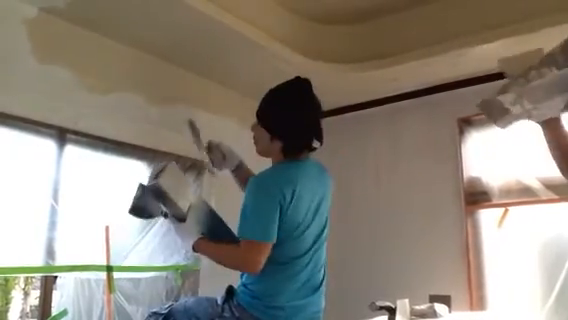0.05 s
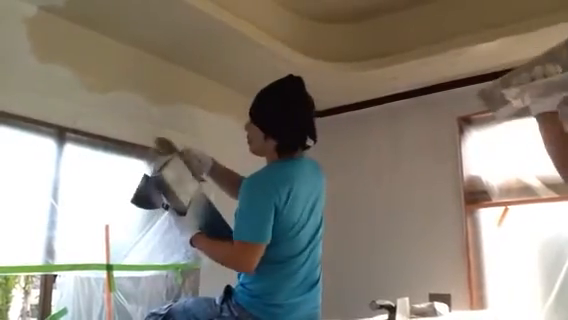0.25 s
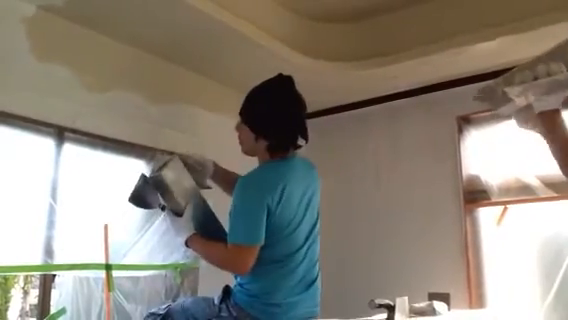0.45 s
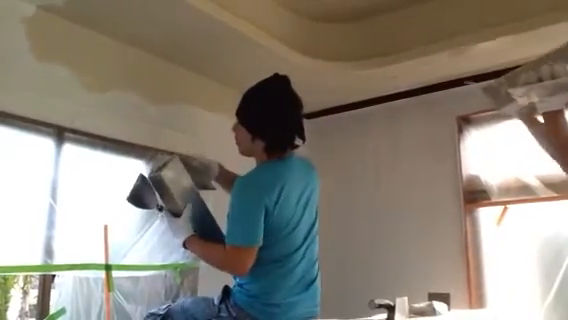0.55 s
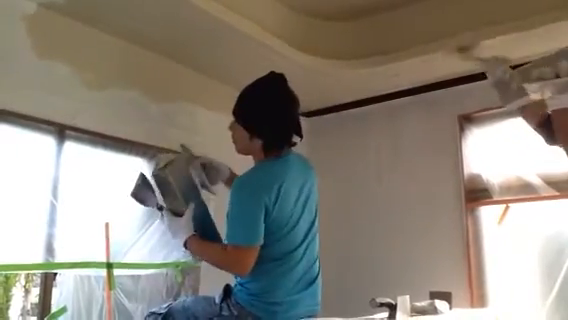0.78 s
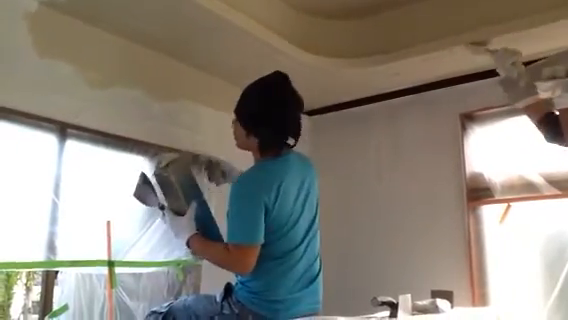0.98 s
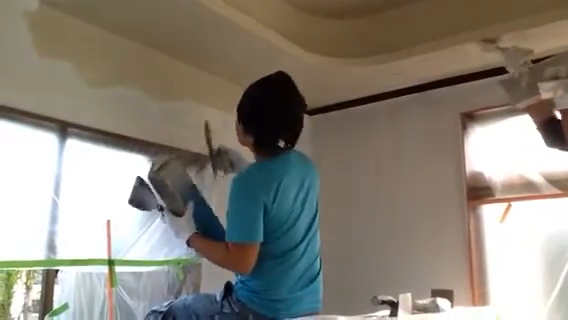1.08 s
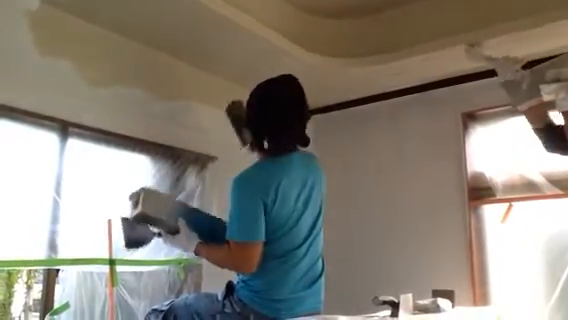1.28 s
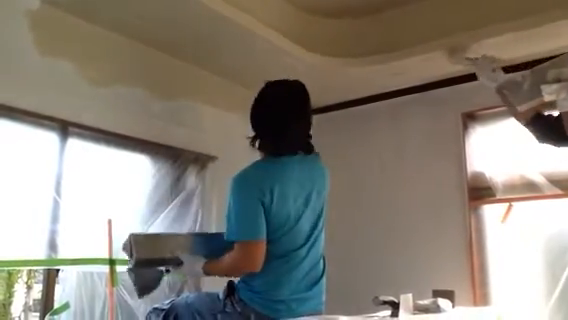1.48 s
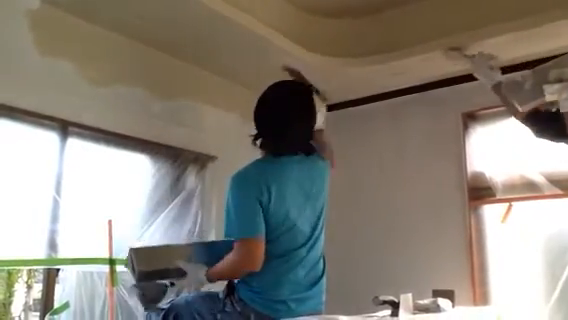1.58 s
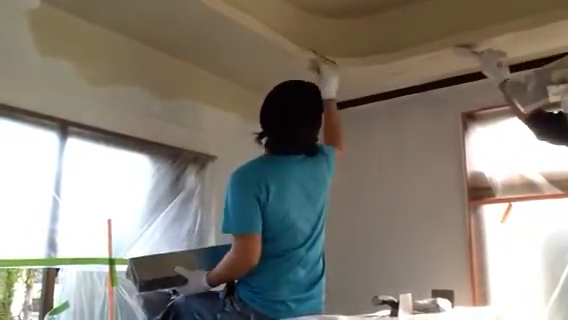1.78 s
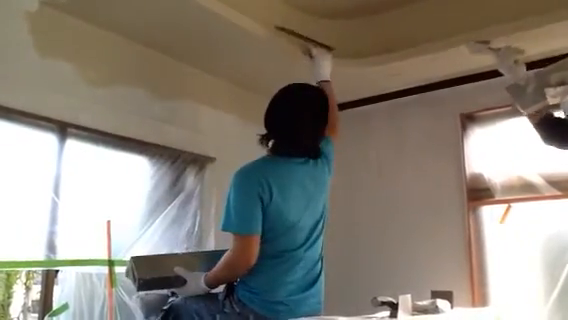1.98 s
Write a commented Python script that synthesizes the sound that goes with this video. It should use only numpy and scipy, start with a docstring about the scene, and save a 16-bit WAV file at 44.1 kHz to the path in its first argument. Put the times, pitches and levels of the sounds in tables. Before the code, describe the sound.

Trowel knocks and a gritty scrape on a plaster board, then a wet slap indoors.

```python
"""In a bare room, a plasterer knocks a steel trowel twice on a hawk (a hand-held mortar board),
scrapes up a load and slaps it on the ceiling. Each impact is a noise burst that reverberates; the
knocks excite the hawk's modes and a low room resonance, the slap and taps the blade's modes. Friction
on sand makes the scrape, and stick-slip motion makes the blade judder. Light taps, faint smoothing
strokes, thin squeaks and one swell of low hum sound over low steady room noise."""
import sys
import numpy as np
from scipy import signal
from scipy.fft import rfft, irfft
from scipy.io import wavfile
from scipy.ndimage import uniform_filter1d

SR = 44100
rng = np.random.default_rng(int(sys.argv[2]) if len(sys.argv) > 2 else 0)


def unload_audio(sound):
    """Save the sound as a 16-bit wav file, at the path given as the first command line argument."""
    columns = np.transpose(np.atleast_2d(sound))
    # keep every value between -1 and 1, then stretch to whole-number steps
    steps = np.round(np.clip(columns, -1, 1) * 32767)
    wavfile.write(sys.argv[1], SR, steps.astype(np.int16))


N = 90404

# Spectra of the sources. Each row: frequency in Hz, relative spectral density in dB.
ROOM_NOISE_SPECTRUM = [(20, -40), (50, -48), (100, -18.5), (150, -3.5), (205, -1), (255, -7), (310, 1.5),
                       (400, -6), (600, -7), (1000, -14.5), (1700, -19.5), (3000, -24.5), (9000, -24),
                       (15500, -28)]
STROKE_SPECTRUM = [(30, -23), (1000, 1), (2700, -10.5), (4300, 2), (8000, 4), (15500, -1)]
THUD_SPECTRUM = [(30, -35), (80, -38), (170, -16.5), (350, -12.5), (520, -4), (800, -0.5), (1020, -6),
                 (1300, 0), (2400, -9.5), (4000, -9), (15000, -57)]
CRACK_SPECTRUM = [(30, -52), (300, -19), (1200, -6), (2300, 7), (3200, -3.5), (5000, -1), (9000, -1),
                  (12000, -4), (15500, -16)]
SCRAPE_SPECTRUM = [(30, -45), (150, -25), (330, -1), (450, -14), (750, -7), (1100, -1.5), (2500, -3),
                   (3900, 2.5), (5200, 0.5), (8000, 3.5), (11500, -2.5), (15500, -5.5)]
SLIP_SPECTRUM = [(30, -62), (100, -49), (190, -5.5), (380, -26.5), (560, -6.5), (680, -3), (770, 5),
                 (1020, -5), (1260, -4), (1420, -6.5), (1600, -1.5), (2300, -18), (4000, -17.5),
                 (15000, -55)]
TAP_SPECTRUM = [(30, -33), (600, -18), (900, 0.5), (1200, -4.5), (1500, -1.5), (1950, 2), (3100, -8.5),
                (4500, -9.5), (8000, -19.5), (15500, -31)]
SPLAT_SPECTRUM = [(30, -34), (90, -25), (170, -1.5), (700, -9), (1000, -9), (1550, 1.5), (2800, 1.5),
                  (4000, 3.5), (6000, 0.5), (10000, 2.5), (15500, -1)]
# Reverberation of the room. Each row: frequency in Hz, time to fall 60 dB (T60) in seconds.
ROOM_T60 = [(150, 0.67), (700, 0.53), (2000, 0.39), (5500, 0.33), (15000, 0.25)]
# Smoothing strokes. Each row: start and length in seconds, level in dB, tilt in dB per octave.
SMOOTHING_STROKES = [(0.036, .24, -62.5, -4.5), (.93, 0.31, -64, -4.5), (1.212, 0.036, -51.5, 5),
                     (1.314, 0.053, -54, 4.5), (1.375, 0.11, -64.5, 4), (1.92, 0.11, -65, -5)]
# Squeaks. Each row: start and length in seconds, first and last frequency in Hz, level in dB.
SQUEAK_GLIDES = [(.11, 0.043, 11900, 13100, -66), (0.735, 0.093, 11900, 11850, -64),
                 (1.88, .06, 12100, 12400, -66)]
# Contacts of trowel and hawk; the first four merge into one knock. Each row: start in seconds,
# thud and crack levels in dB, crack tilt in dB per octave, ring level in dB, contact decay in
# seconds, place struck from 0 (face) to 1 (edge).
KNOCK_CONTACTS = [(0.2459, -36.5, -34.5, -3, -35, 0.0026, 0), (.2478, -36, -27, 2.5, -38.5, 0.0026, 0.053),
                  (0.2534, -33, -27, -2.9, -32, 0.0039, 0.14), (.2625, -25, -46, -10, -38, 0.0032, 0.16),
                  (.4046, -31, -31.5, -0.5, -31.5, 0.0058, 0.87)]
# Tones that ring after a knock: a low room resonance (337 Hz) and the hawk's modes.
# Each row: frequency in Hz, gains in dB for a blow on the face and on the edge, T60 in seconds.
KNOCK_TONES = [(337, -26, -20.5, 0.6), (466, -2, -11, .5), (648, 1, -16, 0.33), (754, -3, -1, 0.47),
               (771, -17, 2.5, 0.56), (853, 4, -9, 0.23), (930, -6, -10, 0.33), (1242, -5.5, 3, 0.27),
               (1584, -9, 1, 0.22), (1777, -17, -8, 0.2), (1900, -25, -1, 0.083), (2070, -13, -16, 0.16),
               (2259, -2, -5.5, 0.23), (2594, 0, -34, 0.083), (3340, -6, -20, 0.15)]
# A drag after the first knock, then the loading stroke. Each row: time in seconds, level in dB.
SCRAPE_ENVELOPE = [(0.263, -43.5), (.33, -37), (.36, -64), (0.449, -59), (.458, -34), (.495, -35),
                   (.515, -31), (0.559, -36.5), (0.598, -46.5), (.625, -74), (.66, -70)]
# The blade digs in, then leaves. Each row: start in seconds, length in seconds, level in dB,
# slips per second, frequency ratio applied to the slip spectrum.
JUDDER_BURSTS = [(0.412, .041, -32, 300, 0.998), (0.604, 0.039, -48.5, 400, 1.582)]
# Low hum. One row: start and length in seconds, centre and half-width in Hz, level in dB.
HUM_SWELL = (0.94, 0.56, 153.5, 21.5, -61.5)
# Tool taps and the slap of plaster. Each row: start in seconds, level in dB, decay in seconds.
TAP_CONTACTS = [(1.136, -43, 0.0057), (1.524, -55.5, 0.028)]
SLAP_CONTACT = (1.7114, -25.5, 0.0036)
# Modes of the blade. Each row: frequency in Hz, level in dB relative to the blow, T60 in seconds.
BLADE_MODES = [(1560, -22, 0.4), (1800, -35, 0.45), (1980, -22, 0.44), (2137, -17.5, 0.37)]

GRAINS_PER_S, GRAIN_SPREAD_DB = 5000, 1.5
CONTACT_RISE_S, RING_RISE_S, ROOM_BUILD_S = 0.00081, 0.001, 0.00067
ROOM_NOISE_DB, CUTOFF_HZ = -57.5, 15270
SLIP_JITTER = 0.4  # standard deviation of the log of the time between slips


def amp(db):
    """Amplitude grows tenfold for every 20 dB."""
    return 10 ** (np.asarray(db) / 20)


def unit_rms(x):
    """Normalisation brings the mean power to 1."""
    return x / np.sqrt(np.mean(x ** 2) + 1e-20)


def value_at(points, hz):
    """Interpolation reads a table along a logarithmic frequency axis."""
    table_hz, value = np.transpose(points)
    return np.interp(np.log(hz + 1), np.log(table_hz + 1), value)


def add(mix, start_s, sound):
    """Superposition: a sound adds to the mix from its start time."""
    part = mix[max(round(start_s * SR), 0):][:len(sound)]
    part += sound[:len(part)]


def colour(x, spectrum, tilt_db=0, size=4096):
    """A minimum-phase filter of unit energy imposes a spectrum, tilted by tilt_db per octave."""
    hz = abs(np.fft.fftfreq(size, 1 / SR))
    log_gain = np.log(amp(value_at(spectrum, hz) + tilt_db * np.log2(1 + hz / 1000)))
    response = np.exp(np.conj(signal.hilbert(log_gain)))
    impulse = np.fft.ifft(response).real[:size // 2]
    return signal.fftconvolve(x, impulse / np.linalg.norm(impulse))


def grains(count):
    """Shot noise: sand grains catch under steel as dense random clicks of uneven size."""
    size = amp(GRAIN_SPREAD_DB * np.minimum(rng.exponential(1, N), 4))
    clicks = size * rng.choice([-1, 1], N) * (rng.random(N) < GRAINS_PER_S / SR)
    return unit_rms(clicks)[:count]


def contact(decay_s):
    """Impulsive excitation: one blow is a broadband clump of grain clicks that dies quickly."""
    t = np.arange(SR // 10) / SR
    envelope = (1 - np.exp(-t / CONTACT_RISE_S)) * np.exp(-t / decay_s)
    burst = grains(len(t)) * envelope
    for _ in range(4):  # flatten the spectrum, then confine the burst in time again
        phase = np.angle(rfft(burst, 2 * len(t)))
        burst = irfft(np.exp(1j * phase))[:len(t)] * envelope ** 0.25
    return burst / (np.linalg.norm(burst) + 1e-12) * np.sqrt(SR / 100)  # energy of 10 ms at rms 1


def ring(hz, t60):
    """Damped oscillation: one mode is a sinusoid that rises quickly and decays exponentially."""
    t = np.arange(SR) / SR
    envelope = (1 - np.exp(-t / RING_RISE_S)) * np.exp(-np.log(1000) * t / t60)
    return envelope * np.sin(2 * np.pi * (hz * t + rng.random()))


def room(x, direct_db=-7):
    """Reverberation: dense reflections from bare walls follow the direct sound; treble dies first."""
    hz, t, noise = signal.stft(rng.standard_normal(SR), SR, nperseg=256)
    decay = np.exp(-np.log(1000) * t / value_at(ROOM_T60, hz)[:, None])
    tail = signal.istft(noise * decay, SR)[1]
    tail *= 1 - np.exp(-np.arange(len(tail)) / SR / ROOM_BUILD_S)
    return amp(direct_db) * x + signal.fftconvolve(x, tail / np.linalg.norm(tail))[:N]


def room_noise():
    """Stationary noise, weighted to low frequencies, is heard as a rumble with a faint hiss."""
    gain = amp(value_at(ROOM_NOISE_SPECTRUM, np.fft.rfftfreq(N, 1 / SR)))
    return amp(ROOM_NOISE_DB) * unit_rms(irfft(rfft(rng.standard_normal(N)) * gain, N))


def smoothing():
    """Sliding friction: steel hisses lightly over wet plaster, rising and falling with each stroke."""
    out = np.zeros(N)
    for start, length, db, tilt_db in SMOOTHING_STROKES:
        arch = np.sin(np.linspace(0, np.pi, int(length * SR)))
        add(out, start, amp(db) * colour(grains(len(arch)) * arch, STROKE_SPECTRUM, tilt_db))
    return out


def squeaks():
    """Frictional vibration: the sliding steel gives thin tones that glide and waver in pitch."""
    out = np.zeros(N)
    for start, length, from_hz, to_hz, db in SQUEAK_GLIDES:
        progress = np.linspace(0, 1, int(length * SR))
        waver = unit_rms(uniform_filter1d(rng.standard_normal(N), size=60))[:len(progress)]
        hz = (from_hz + (to_hz - from_hz) * progress) * (1 + 0.0077 * waver)
        tone = np.sin(2 * np.pi * np.cumsum(hz) / SR)
        add(out, start, amp(db) * np.sin(np.pi * progress) * tone)
    return out


def knocks():
    """Impact on the loaded hawk: the board thuds and crushed sand cracks, each with its reflections."""
    out = np.zeros(N)
    for start, thud_db, crack_db, tilt_db, _, decay_s, _ in KNOCK_CONTACTS:
        thud, crack = np.zeros((2, N))
        add(thud, start, amp(thud_db) * colour(contact(decay_s), THUD_SPECTRUM))
        add(crack, start, amp(crack_db) * colour(contact(decay_s), CRACK_SPECTRUM, tilt_db))
        out += room(thud, direct_db=-4) + room(crack, direct_db=-1.5)
    return out


def knock_ring():
    """Resonance: the hawk's modes and one low room mode ring on, balanced by the place struck."""
    out = np.zeros(N)
    for start, _, _, _, ring_db, _, place in KNOCK_CONTACTS:
        for hz, face_db, edge_db, t60 in KNOCK_TONES:
            mode_db = face_db + (edge_db - face_db) * place
            add(out, start, amp(ring_db + mode_db) * ring(hz, t60))
    return out


def scrape():
    """Granular friction: the blade pushes sandy plaster across the hawk, louder with more force."""
    times, db = np.transpose(SCRAPE_ENVELOPE)
    force = np.interp(np.arange(N) / SR, times, amp(db), left=0, right=0)
    return colour(grains(N) * force, SCRAPE_SPECTRUM)[:N]


def judder():
    """Stick-slip motion: the edge catches and lets go, kicking the board at uneven intervals."""
    out = np.zeros(N)
    for start, length, db, rate, pitch_ratio in JUDDER_BURSTS:
        gaps = np.exp(SLIP_JITTER * rng.standard_normal(64)) / rate
        times = np.cumsum(gaps) - gaps[0]
        slips = np.zeros(int(length * SR) + 1)
        slips[(times[times < length] * SR).astype(int)] = 1
        spectrum = np.multiply(SLIP_SPECTRUM, [pitch_ratio, 1])
        add(out, start, amp(db) * colour(unit_rms(slips), spectrum))
    return out


def hum():
    """Narrow-band noise has a pitch: it is heard as a low hum that swells, holds and fades."""
    start, length, hz, half_width_hz, db = HUM_SWELL
    band = np.exp(-((np.fft.rfftfreq(N, 1 / SR) - hz) / half_width_hz) ** 2)
    noise = unit_rms(irfft(rfft(rng.standard_normal(N)) * band, N))
    progress = np.clip((np.arange(N) / SR - start) / length, 0, 1)
    return amp(db) * noise * np.minimum(4 * np.sin(np.pi * progress), 1)


def blade_hit(start, db, decay_s, spectrum, direct_db):
    """Modal excitation: a short contact reverberates and sets the steel blade ringing faintly."""
    blow = np.zeros(N)
    add(blow, start, amp(db) * colour(contact(decay_s), spectrum))
    out = room(blow, direct_db)
    for hz, mode_db, t60 in BLADE_MODES:
        add(out, start, amp(db + mode_db) * ring(hz, t60))
    return out


def taps():
    """Light impacts of the tools give midrange clicks, heard mostly by reflection."""
    return sum(blade_hit(*tap, TAP_SPECTRUM, direct_db=-9) for tap in TAP_CONTACTS)


def slap():
    """Inelastic impact: wet plaster on the blade meets the ceiling with a bright splat."""
    return blade_hit(*SLAP_CONTACT, SPLAT_SPECTRUM, direct_db=-4.5)


def scene():
    """The sources superpose in one channel; the judder has more direct sound than the scrape."""
    tools = knocks() + room(judder(), direct_db=2.0) + slap() + taps()
    sliding = room(scrape() + smoothing() + squeaks())
    return (tools + sliding + knock_ring() + room_noise() + hum())[None]


def record(dry):
    """Band limiting: a linear-phase low-pass filter removes the highest treble."""
    low_pass = signal.firwin(511, CUTOFF_HZ, window=("kaiser", 9), fs=SR)
    return signal.oaconvolve(dry, low_pass[None], "same")


dry = scene()
out = record(dry)
unload_audio(out)
```